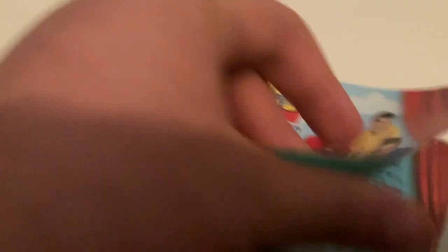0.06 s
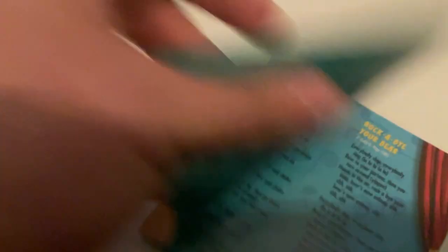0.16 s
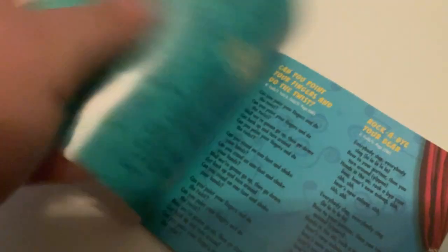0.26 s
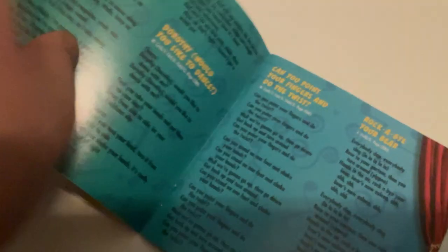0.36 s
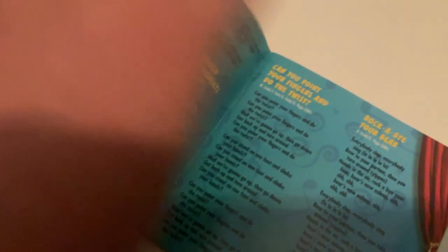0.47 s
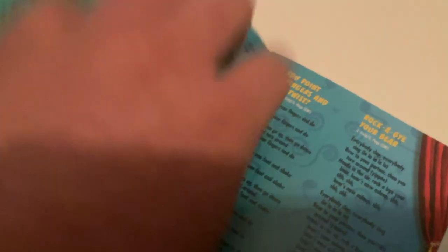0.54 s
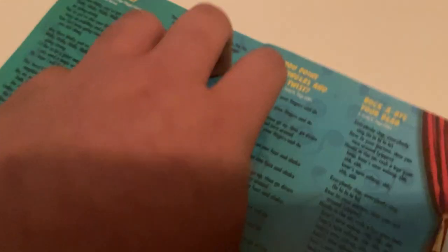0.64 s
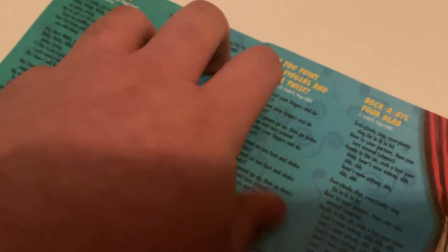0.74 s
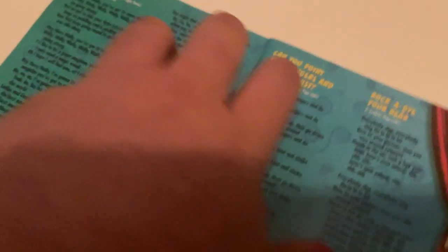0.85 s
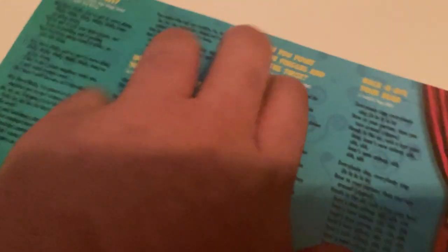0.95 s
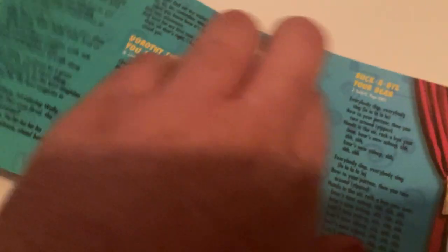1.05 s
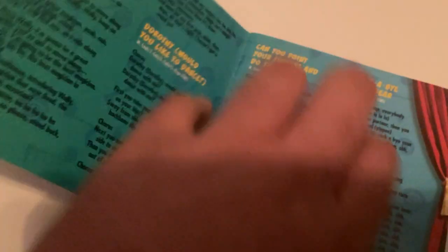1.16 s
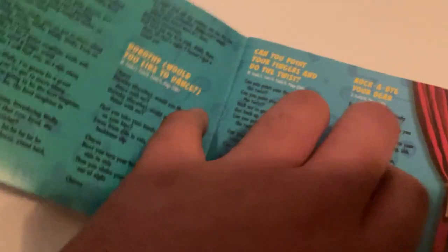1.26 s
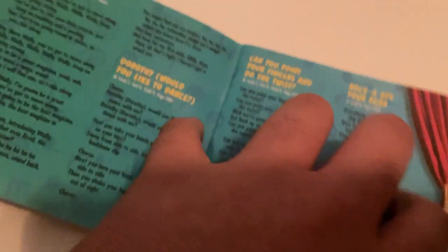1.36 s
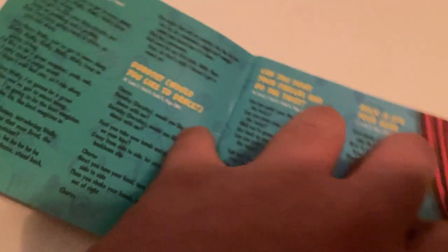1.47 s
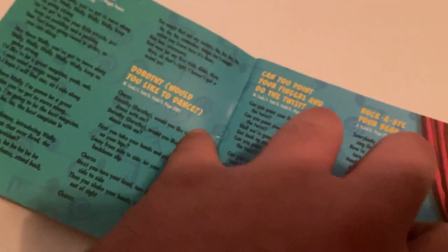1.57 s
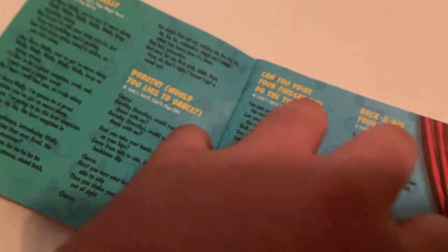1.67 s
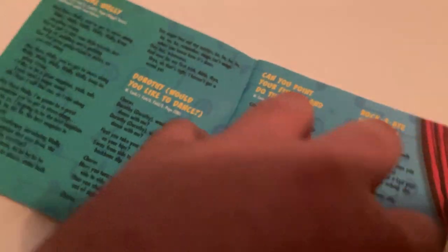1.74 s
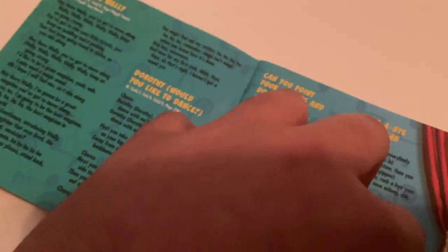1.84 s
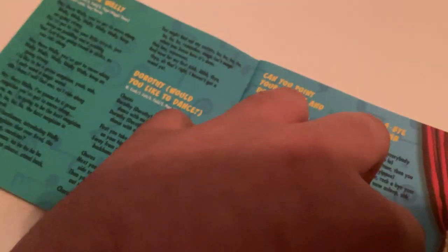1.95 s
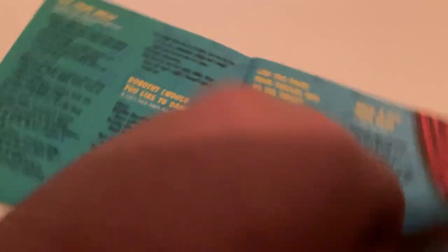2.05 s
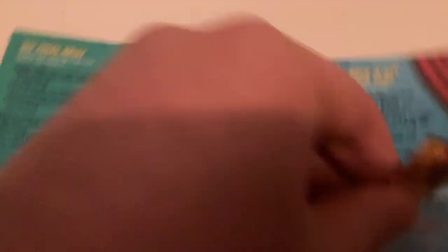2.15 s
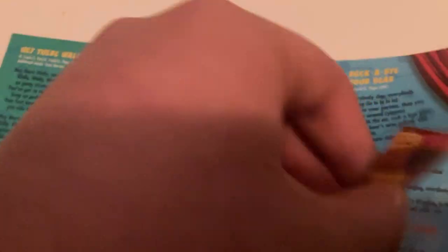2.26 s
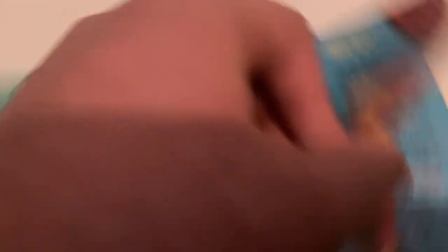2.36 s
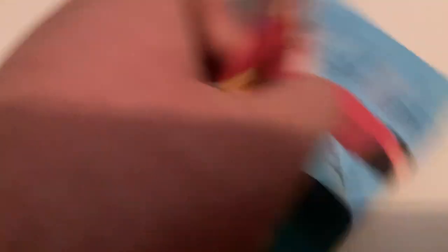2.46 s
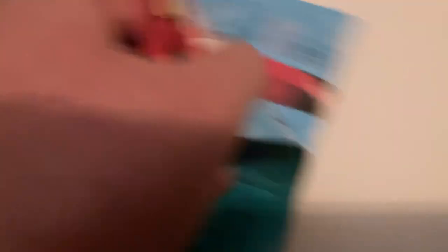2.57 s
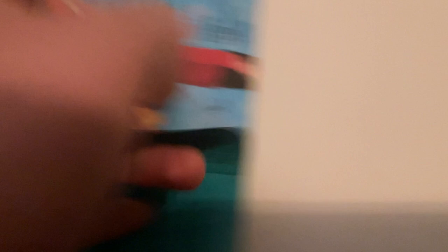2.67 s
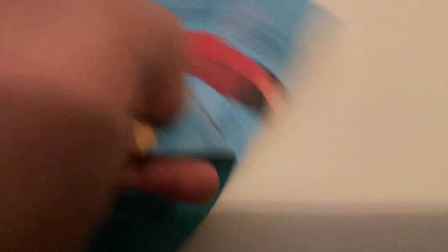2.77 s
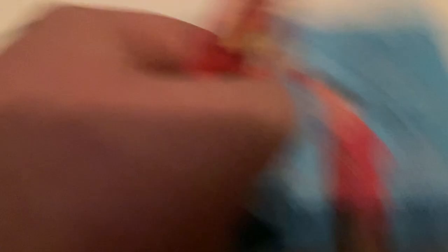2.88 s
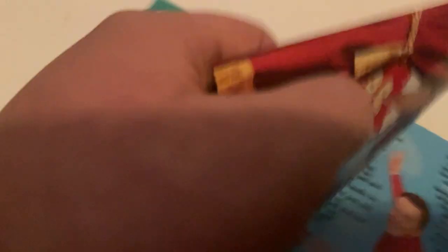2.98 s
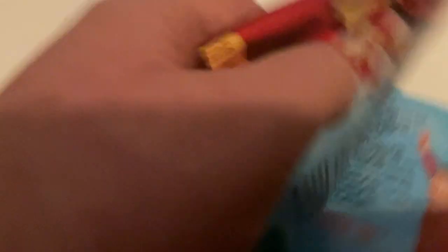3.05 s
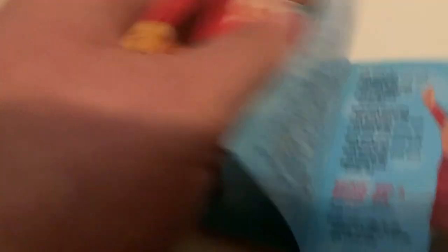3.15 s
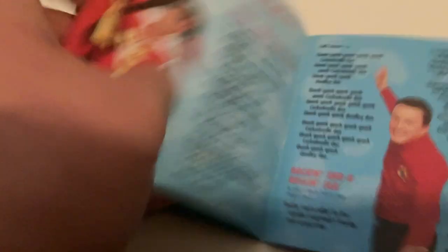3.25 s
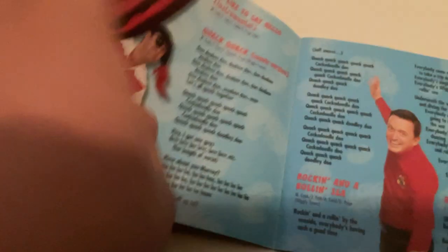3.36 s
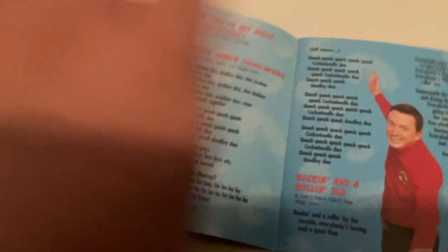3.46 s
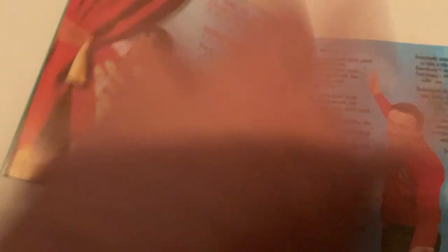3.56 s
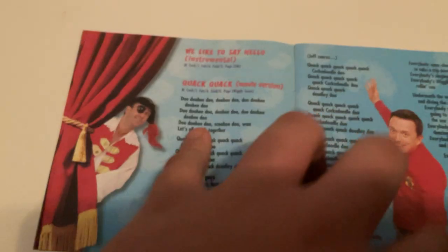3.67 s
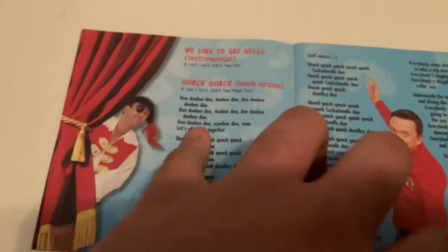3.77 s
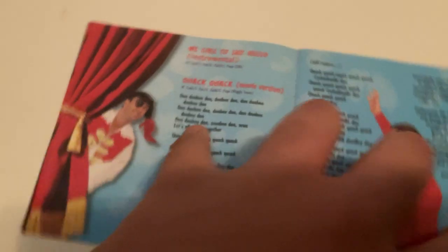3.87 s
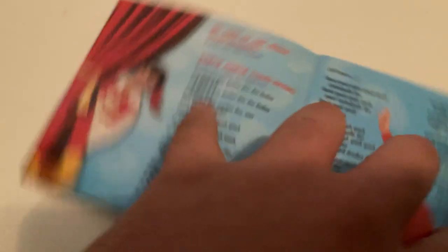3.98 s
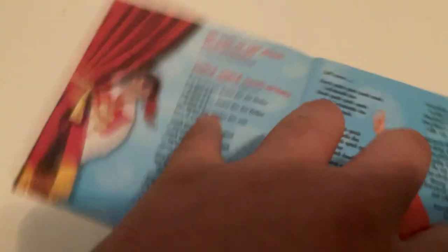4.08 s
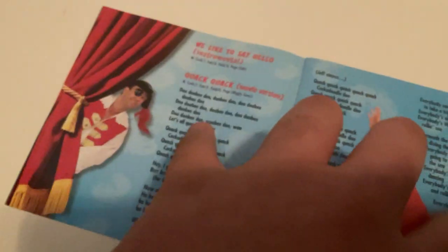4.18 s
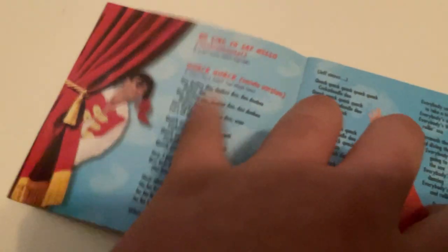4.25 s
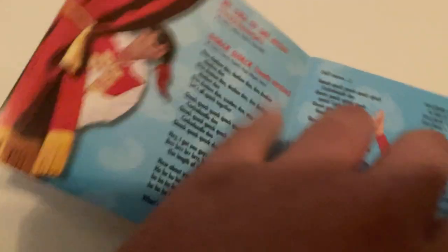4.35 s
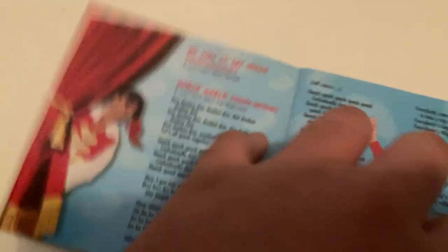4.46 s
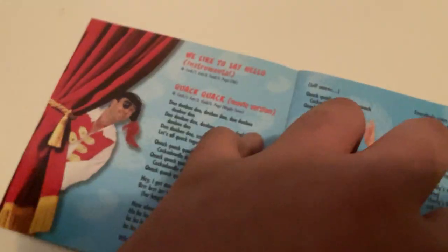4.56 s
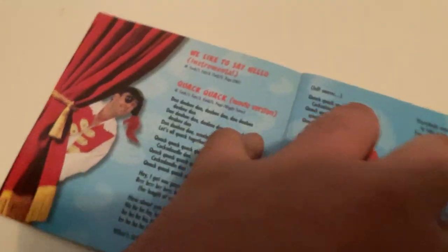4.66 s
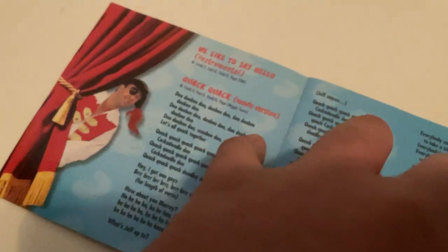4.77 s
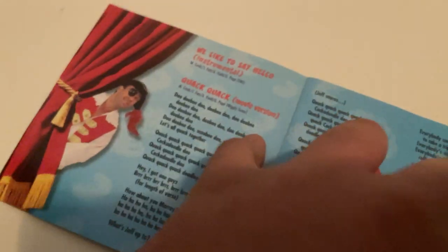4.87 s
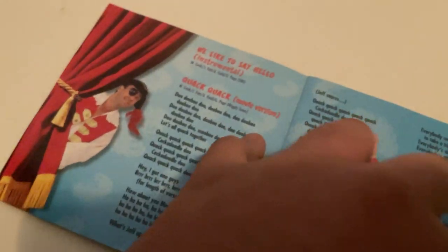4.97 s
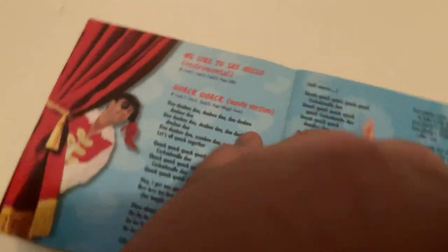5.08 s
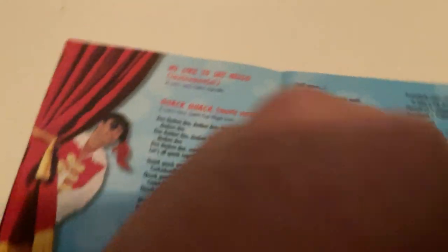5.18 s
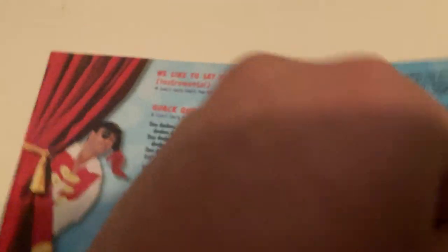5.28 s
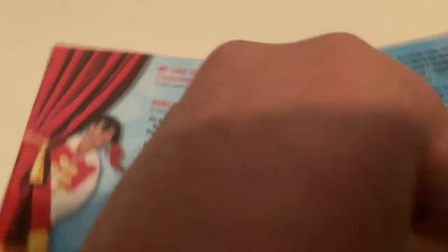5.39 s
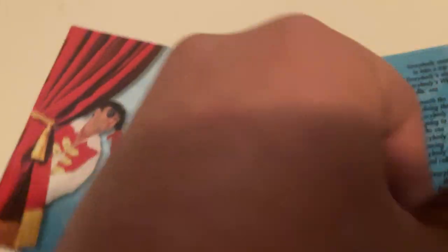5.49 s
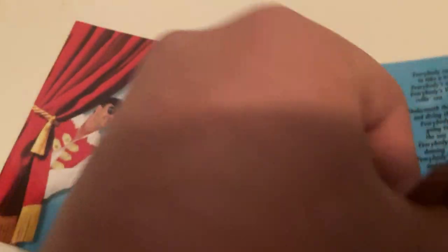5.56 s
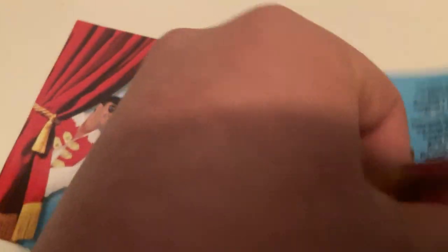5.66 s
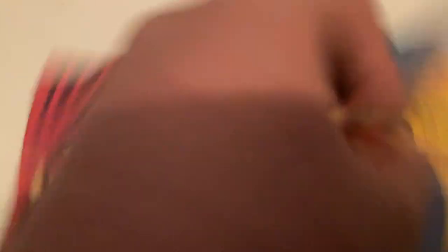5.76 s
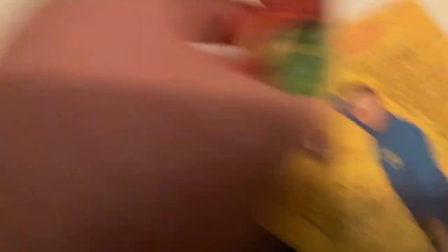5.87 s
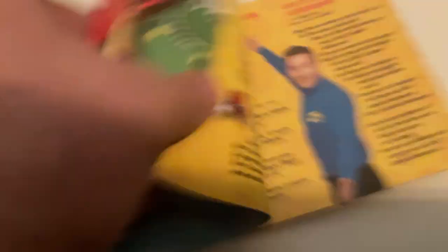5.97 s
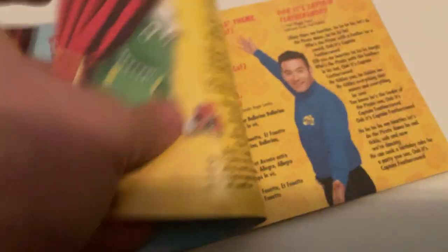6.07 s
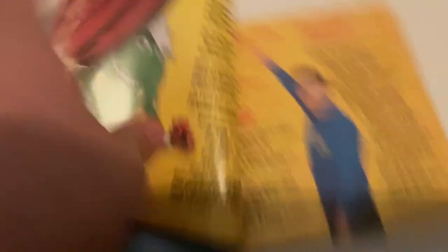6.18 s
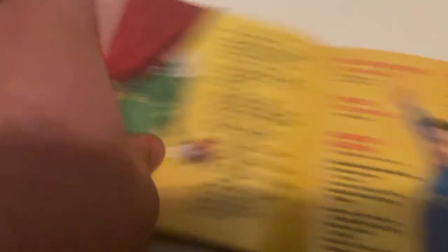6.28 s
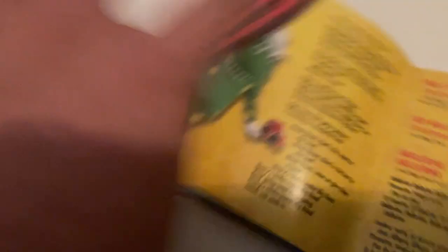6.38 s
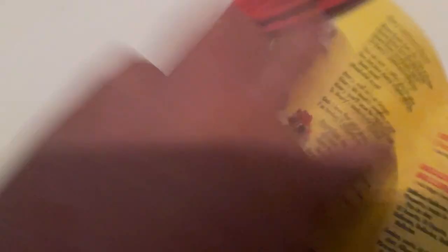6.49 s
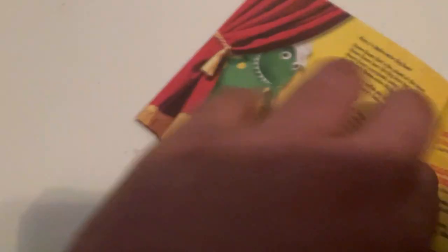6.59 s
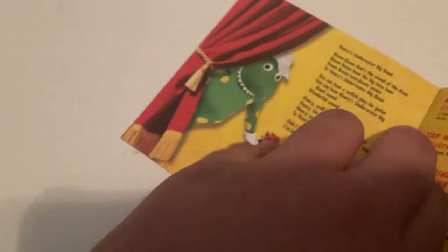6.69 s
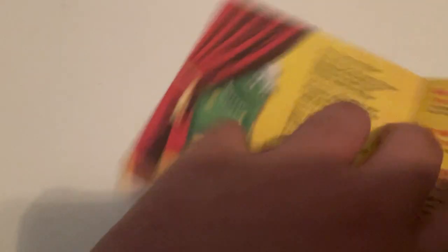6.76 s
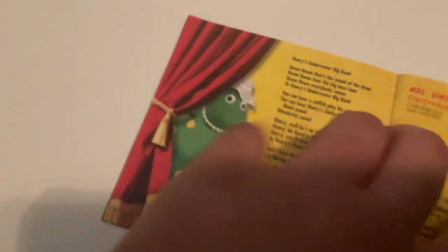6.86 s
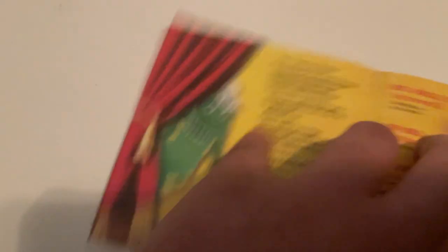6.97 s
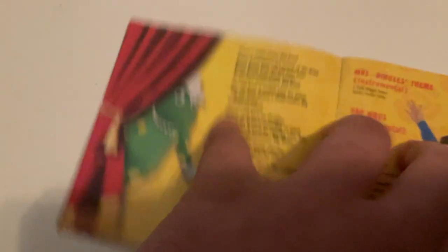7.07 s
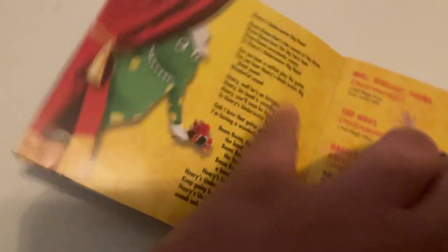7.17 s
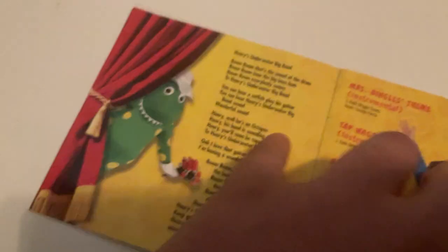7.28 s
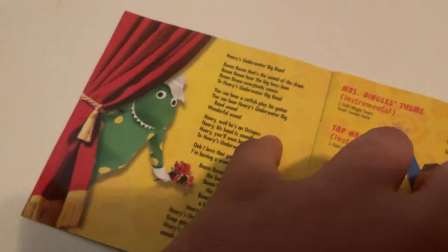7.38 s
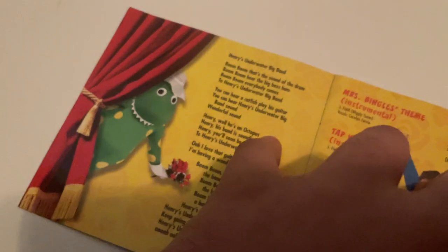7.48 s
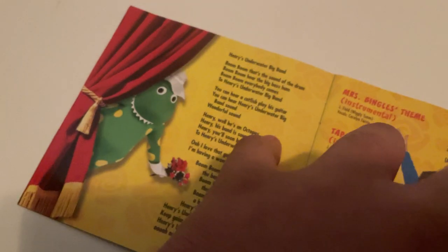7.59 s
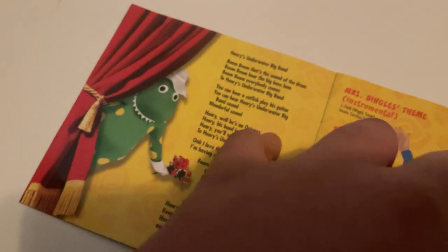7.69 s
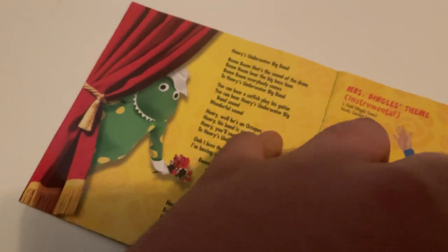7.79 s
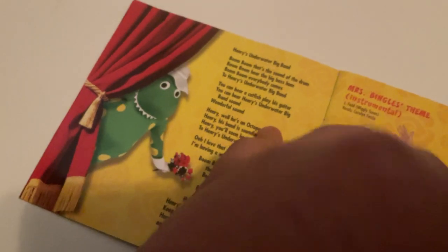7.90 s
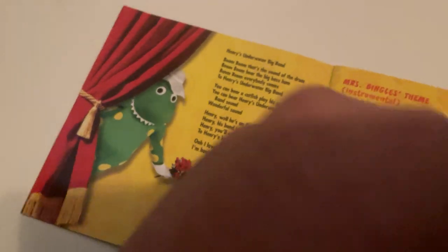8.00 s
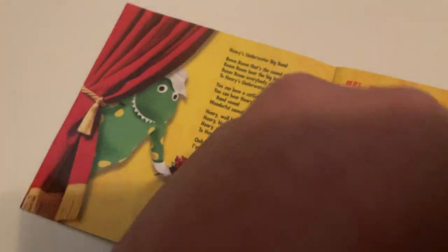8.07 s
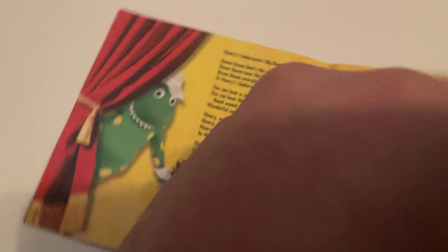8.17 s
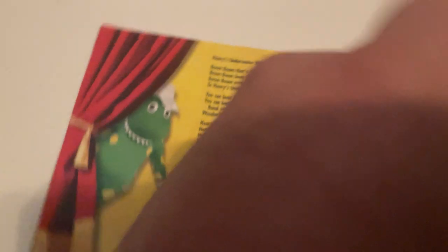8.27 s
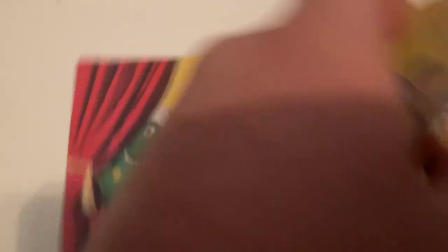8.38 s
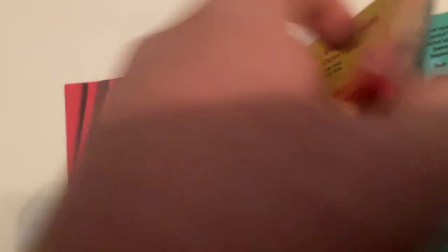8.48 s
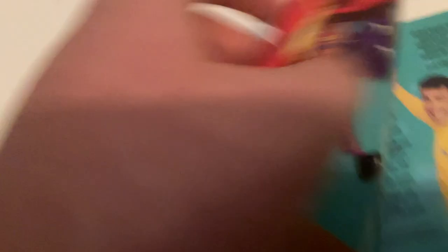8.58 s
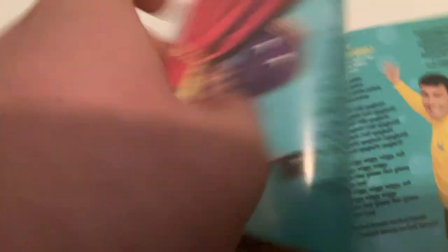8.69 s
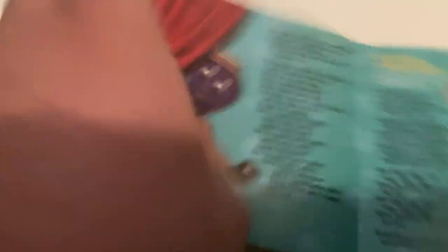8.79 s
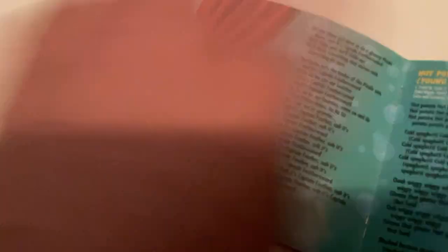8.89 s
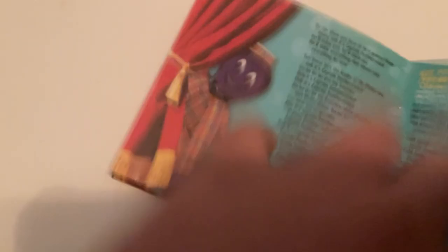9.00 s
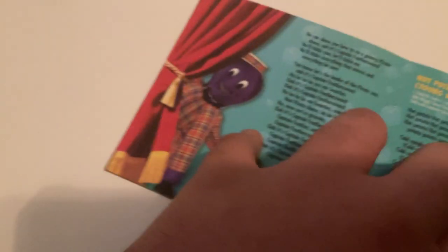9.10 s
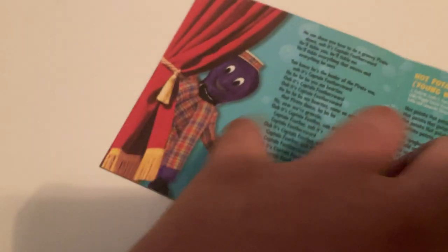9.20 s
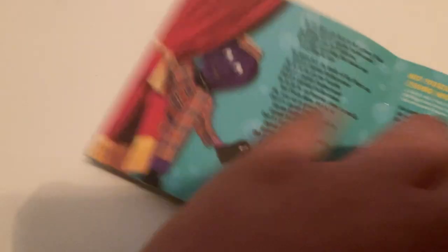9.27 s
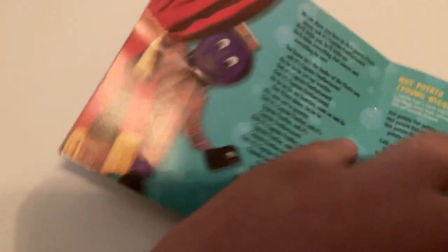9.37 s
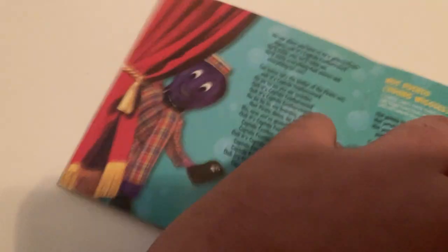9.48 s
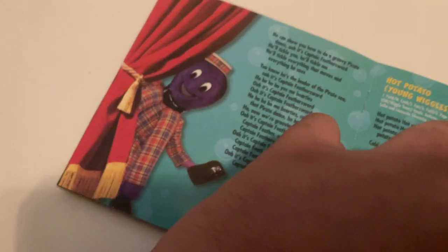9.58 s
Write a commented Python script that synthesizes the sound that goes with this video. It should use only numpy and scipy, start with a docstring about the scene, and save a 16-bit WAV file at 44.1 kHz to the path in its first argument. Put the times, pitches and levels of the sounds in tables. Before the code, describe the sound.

A glossy paper booklet is handled on a table, very close, in a small quiet room with short sparse reflections. It opens with a crisp flick, then light rustling and a small flap with a soft thump near 0.6 s. From 1 to 2 s there is only faint rubbing and ticks. Around 2.25 s the paper crackles, and sliding hiss builds into sharp flicks at 3.45 s and a hard double slap at 3.6 s. Quiet smoothing follows until 5.2 s, when scrapes and flicks resume. The busiest turn comes at 6.0-6.3 s, with loud snaps and a bright swish. Soft rubbing and small ticks fill 6.6-8.4 s. Another turn snaps at 8.6-8.85 s, then slaps down with a low thump at 9.05 s and fades into faint rubbing. Low rumble and thin hiss continue throughout, with a faint deep hum early and a slightly higher one from 7.3 s.

```python
"""A glossy paper booklet is leafed through by hand on a table, close to the microphone, in a small quiet room.
Sliding fingers and sheets hiss with dense friction grains; buckling sheets snap as pulses with a short ring.
Pages flick free or slap down in quick swelling runs of grains, and soft low thumps settle on the table.
The table top rings along, sparse reflections give the room, and a low rumble and two faint drones lie underneath."""
import sys
import numpy as np
from scipy import signal
from scipy.io import wavfile
from scipy.ndimage import map_coordinates

SR = 44100
rng = np.random.default_rng(int(sys.argv[2]) if len(sys.argv) > 2 else 0)


def unload_audio(sound):
    """Save the sound as a 16-bit wav file, at the path given as the first command line argument."""
    columns = np.transpose(np.atleast_2d(sound))
    # keep every value between -1 and 1, then stretch to whole-number steps
    steps = np.round(np.clip(columns, -1, 1) * 32767)
    wavfile.write(sys.argv[1], SR, steps.astype(np.int16))


N = 425124
EDGE_HZ = 16000  # top of the audible band here


def gain_of(db):
    """Decibels to amplitude."""
    return 10 ** (np.asarray(db) / 20)


def evened(x):
    """Scales to an rms of one."""
    return x / np.sqrt(np.mean(x ** 2) + 1e-20)


def read(points, hz):
    """Reads a curve over frequency on a log-frequency axis."""
    f, value = np.transpose(points)
    return np.interp(np.log(hz + 1), np.log(f + 1), value)


def add(mix, s, sound):
    """Mixes a sound in at time s, trimmed to fit."""
    start = round(s * SR)
    sound = sound[max(-start, 0):]
    part = mix[max(start, 0):][:len(sound)]
    part += sound[:len(part)]


def band(x, lo_hz, hi_hz, order=2):
    """Causal band-pass."""
    edges = [min(lo_hz, hi_hz / 1.1), min(hi_hz, SR / 2.1)]
    return signal.sosfilt(signal.butter(order, edges, "band", fs=SR, output="sos"), x)


def colour(x, points):
    """Gives x a spectrum, causally (minimum phase), so that clicks stay sharp."""
    hz = abs(np.fft.fftfreq(4096, 1 / SR))
    log_gain = np.log(gain_of(read(points, hz)))
    taps = np.fft.ifft(np.exp(np.conj(signal.hilbert(log_gain)))).real
    return signal.fftconvolve(x, taps[:len(taps) // 2])[:len(x)]


def wander(per_s):
    """A smooth random curve through per_s random points a second."""
    knots = rng.standard_normal(int(per_s * N / SR) + 2)
    return map_coordinates(knots, [np.arange(N) * per_s / SR], order=3, mode="nearest")


# spectrum of the background rumble and hiss, relative levels: hz [Hz], level_db [dB per Hz]
RUMBLE_SPECTRUM = [(45, -10), (115, -3), (160, -9.5), (240, -8.5), (480, -25), (900, -22), (1450, -31.5),
                   (2750, -27.5), (3300, -29.5), (8700, -72), (15800, -64.5)]


def room_tone(level_db=-57):
    """Steady rumble with a thin hiss: coloured noise."""
    return gain_of(level_db) * evened(colour(rng.standard_normal(N), RUMBLE_SPECTRUM))


# lower drone, from the start: start_s [s], pitch_hz [Hz], level_db [dB]
LOW_DRONE = [(0, 64, -59.5), (2.6, 61.75, -62), (4.0, 64.3, -71)]
# higher drone, entering late: start_s [s], pitch_hz [Hz], level_db [dB]
HIGH_DRONE = [(7.25, 95, -69), (7.6, 103, -55.5), (8.3, 106.7, -54.5), (9.6, 103.6, -65.5)]


def drone(rows, waver_db=.7):
    """A low distant tone: a sine gliding between the rows, its level wavering a little."""
    s, *columns = np.transpose(rows)
    t = np.arange(N) / SR
    hz, level_db = (np.interp(t, s, c) for c in columns)
    gain = gain_of(level_db + waver_db * wander(per_s=6))
    tone_wave = np.sqrt(2) * np.sin(2 * np.pi * np.cumsum(hz) / SR)
    return (t >= s[0]) * gain * tone_wave


# how fast the reflections die: hz [Hz], t60_s [s]
REFLECTION_DECAY = [(200, 0.2), (15000, 0.11)]


def room(x, gap_s=.004, per_s=3000):
    """Sparse reflections of random sign; the treble dies first."""
    t = np.arange(SR // 2) / SR
    taps = rng.choice([-1, 1], len(t)) * (rng.random(len(t)) < per_s / SR) * (t > gap_s)
    hz, age, spectra = signal.stft(taps, SR, nperseg=256)
    fading = gain_of(-60 * age / read(REFLECTION_DECAY, hz)[:, None])
    tail = signal.istft(spectra * fading, SR, nperseg=256)[1]
    return signal.fftconvolve(x, tail / np.linalg.norm(tail))[:N]


# ringing modes of the table top: pitch_hz [Hz], level_db [dB]
TABLE_MODES = [(1620, -26), (4600, -44)]


def table_top(x, t60_s=0.0081):
    """Whatever touches the booklet also rings the table under it: short decaying modes."""
    t = np.arange(SR // 4) / SR
    dying = gain_of(-60 * t / t60_s)
    modes = [gain_of(db) * evened(np.cos(2 * np.pi * hz * t) * dying) for hz, db in TABLE_MODES]
    return signal.fftconvolve(x, sum(modes) / np.sqrt(len(t)))[:N]


# the hand or the booklet settles on the table: start_s [s], level_db [dB], pitch_hz [Hz]
SETTLING = [(0.03, -49, 226), (0.612, -42, 97), (3.61, -41, 80), (3.644, -41, 100), (6.69, -44, 119),
            (8.63, -42, 75), (8.72, -49, 109), (9.019, -35.5, 106), (9.06, -36, 211)]


def bumps(rise_s=0.0014, decay_s=0.017):
    """A soft weight lands: a few low cycles of the table."""
    out, t = np.zeros(N), np.arange(SR // 5) / SR
    envelope = (1 - np.exp(-t / rise_s)) * np.exp(-t / decay_s)
    for s, level_db, hz in SETTLING:
        cycles = np.sqrt(2) * np.sin(2 * np.pi * hz * t)
        add(out, s, gain_of(level_db) * envelope * cycles)
    return out


# spectrum of sliding paper, relative levels: hz [Hz], level_db [dB per Hz]
PAPER_SPECTRUM = [(180, -46.5), (300, -13.5), (424, -0.5), (631, -8.5), (1300, -0.5), (1590, 5),
                  (2250, -8.5), (3630, -4), (5660, -8.5), (9450, -17), (15500, -8.5)]


def paper_colour(x):
    """Filters x to the tone of paper rubbing on paper."""
    return colour(x, PAPER_SPECTRUM)


def grains(count, per_s, spread_db):
    """Tiny slips of fibre over fibre: random clicks of uneven size."""
    size = gain_of(spread_db * np.minimum(rng.exponential(1, count), 4))
    return evened(size * rng.standard_normal(count) * (rng.random(count) < per_s / SR))


def flexing(x, share=0.32, sway=0.188):
    """Echoes between page, hand and table shift as the sheet bends, so the tone of the rubbing drifts."""
    t = np.arange(N) / SR
    soft = band(x, 500, 7000, order=1)
    gaps_s = (.0003, .0006, .00095, .0019)
    echoes = sum(np.interp(t - gap * np.exp(sway * wander(per_s=6)), t, soft) for gap in gaps_s)
    return x - share * echoes


REST_DB = -82.5  # the hand at rest still creeps on the page
# a finger or a sheet slides once: start_s [s], length_s [s], hiss_db [dB], swell_db from start to end [dB],
# body_db of the sheet [dB re hiss], fizz_db [dB re hiss]
SLIDES = [(0, 0.13, -59.5, -13, -8, -8.5), (0.158, 0.19, -59, -2.5, -9, -3),
          (0.409, 0.15, -65.5, -5, -2, 2), (0.544, 0.072, -56.5, 6, -10, -4),
          (0.625, 0.38, -65, 11.5, -12, -0.5), (1.191, 0.15, -71, 4.5, -9, -5),
          (1.344, 0.13, -66, 15.5, -13, -3), (1.715, 0.089, -69, 17, -4, -6.5),
          (1.95, 0.098, -72, 3, -6, 2), (2.022, 0.14, -55.5, 10.5, -7, -4),
          (2.237, 0.086, -49.5, 0, -2.5, -8.5), (2.33, 0.32, -51.5, 9, -17, -4),
          (2.666, 0.17, -47.5, -3, -17, -0.5), (2.86, 0.1, -46, 3.5, -10, -4),
          (2.98, .12, -54, 6, -8.5, -3.5), (3.138, 0.3, -52.5, 3.5, -9, -4.5),
          (3.635, .03, -48, -16, -6, -6), (3.801, 0.2, -59, 1.5, -15, -4),
          (4.042, .22, -65.5, -10, -10, -3.5), (4.336, 0.17, -62, 6.5, -10, -4),
          (4.537, 0.24, -69, 8, -15, -3), (4.846, 0.035, -57.5, -3.5, -13, -6),
          (4.999, 0.44, -58, 8.5, -7.5, -4), (5.259, 0.081, -47.5, -7.5, -5, -3.5),
          (5.369, 0.25, -52, -8.5, -4.5, -3.5), (5.645, 0.22, -52.5, 15.5, -10.5, -1),
          (5.91, 0.064, -43.5, 3, -11, -4.5), (6.027, 0.15, -57.5, 16, -8, -4.5),
          (6.161, 0.15, -38.5, 4, -10, -4), (6.3, 0.19, -51.5, 16.5, -11.5, -6),
          (6.61, 0.11, -59, -7.5, -12, -3), (6.745, 0.077, -52.5, -2.5, -7.5, 1.5),
          (6.856, 0.092, -57, -0.5, -9, -4), (6.977, .17, -51, -6.5, -15.5, -4.5),
          (7.178, 0.14, -61, -3, -11, -2.5), (7.402, 0.058, -67, -13, -21, -4),
          (7.63, 0.21, -73, 17, -1, -1), (7.86, .15, -57.5, -2.5, -9, -2.5),
          (8.039, 0.06, -59.5, 1, -11, -13), (8.129, 0.12, -57.5, -6.5, -0.5, -6),
          (8.24, 0.18, -62.5, 10, -4, -0.5), (8.444, .2, -58, 9, -6.5, -1.5),
          (8.679, 0.16, -47, 3.5, -3, -2.5), (9.018, .085, -51, -17.5, -3, -4.5),
          (9.14, 0.19, -65.5, 5.5, -8, -2), (9.335, .15, -59, 11, -10, -7.5),
          (9.537, 0.093, -66, -1, -6, -17)]


def strokes(attack_s=0.017, release_s=0.03, arch_db=2):
    """Levels (dB) of hiss, body and fizz: a stroke gets going, arches midway, and coasts to a stop."""
    power = np.full((3, N), gain_of(REST_DB) ** 2)
    for start, length, level_db, swell_db, body_db, fizz_db in SLIDES:
        t = np.arange(0, length + 8 * release_s, 1 / SR)
        along = np.minimum(t / length, 1)
        arch = arch_db * (np.sin(np.pi * along) - 2 / np.pi)
        hold = gain_of(level_db + swell_db * (along - .5) + arch)
        attack = np.minimum(t / attack_s, 1)
        release = np.exp(-np.maximum(t - length, 0) / release_s)
        speed = attack * hold * release
        for layer, db in zip(power, (0, body_db, fizz_db)):
            add(layer, start, (speed * gain_of(db)) ** 2)
    return 10 * np.log10(power)


def sliding(catch_s=.0013, judder_db=1.76, tick_db=-37, ticks_per_s=28):
    """Dense friction grains under an unsteady hand; slow rubbing breaks up into separate ticks."""
    level_db, body_db, fizz_db = strokes()
    judder = evened(band(rng.standard_normal(N), 17.5, 85))
    hits = rng.random(N) * (rng.random(N) < ticks_per_s / SR)
    catches = signal.lfilter([1], [1, -np.exp(-1 / (catch_s * SR))], hits)
    # ticks stand out most where the rubbing is light
    ticks = evened(catches * rng.standard_normal(N)) * gain_of(tick_db - .5 * level_db)
    ticks = ticks * (1 - gain_of(REST_DB - level_db))  # and stop when the hand rests
    friction = grains(N, per_s=15000, spread_db=-2.1) * gain_of(judder_db * judder) + ticks
    rub = paper_colour(flexing(friction))
    # a lifted sheet radiates its low body; a flat one leaves hiss and the fizz of the fibres
    body = gain_of(body_db) * evened(band(rub, 310, 1235, order=3))
    hiss = gain_of(level_db) * evened(band(rub, 2135, 6520, order=4))
    fizz = gain_of(fizz_db) * evened(band(rub, 7120, EDGE_HZ, order=4))
    return body + hiss + fizz


def tone(level_db, hz, crack_db, usual_thud_db):
    """Thud, crack and fizz of a contact (dB re ring) follow from its force, its pitch and its sharpness."""
    force_db = level_db + 43  # re a contact of usual level
    octaves = np.log2(hz / 2000)  # re the usual pitch
    # large, low folds thud more; hard contacts add more ring than thud
    thud_db = usual_thud_db - 4.5 * octaves - 0.228 * force_db
    # fizz follows the crack, and lags behind in hard contacts
    fizz_db = -7.5 + 0.42 * crack_db - 0.3527 * force_db
    return thud_db, crack_db, fizz_db


def sheet(push, crackle, level_db, hz, thud_db, crack_db, fizz_db, width=1.59):
    """A contact rings the bent sheet briefly, thuds through the pages below, and cracks and fizzes in the treble."""
    ring = evened(band(push, hz / width, hz * width, order=3))
    thud = gain_of(thud_db) * evened(band(push, 135, 570))
    crack = gain_of(crack_db) * evened(band(crackle, 3700, 7000, order=4))
    fizz = gain_of(fizz_db) * evened(band(paper_colour(crackle), 8500, EDGE_HZ, order=4))
    over_10_ms = np.sqrt(.01 * SR / len(push))  # the ring's level counts its energy over 10 ms
    return gain_of(level_db) * (ring + thud + crack + fizz) * over_10_ms


# a page edge scrapes past or lands: peak_s [s], level_db of the ring over 10 ms [dB], pitch_hz of the ring [Hz],
# crack_db [dB re ring], length_s [s]
PAGE_FLICKS = [(0.007, -33.5, 2920, -11.5, 0.011), (0.062, -48.5, 2280, -17, 0.03),
               (0.474, -45, 1340, -8, 0.017), (0.595, -43, 980, -24, 0.025),
               (1.009, -49, 2100, -7.5, 0.022), (1.2, -49.5, 630, -33, .026), (2.705, -51, 1500, -8, 0.027),
               (3.047, -50.5, 2060, -16, 0.013), (3.183, -51, 1900, -6, 0.02),
               (3.325, -42.5, 1400, -8, 0.028), (3.344, -36, 1560, -15, 0.019),
               (3.433, -47.5, 2550, 12, 0.0035), (3.45, -38.5, 1480, -41, 0.014),
               (3.461, -29, 1650, -12, 0.0063), (3.6043, -22, 3630, -24, 0.0083),
               (3.6053, -21.5, 1740, -20, 0.011), (3.627, -33.5, 2000, -6.5, .024),
               (3.644, -29.5, 2310, -9, 0.012), (4.087, -50, 2450, -1.5, 0.0077),
               (4.243, -54, 2430, 4, 0.0053), (5.296, -32, 1950, -10, 0.028),
               (5.345, -44.5, 1650, -14, .04), (5.466, -38, 2350, -0.5, 0.018),
               (5.524, -28, 3700, -11, 0.0055), (5.554, -32, 1700, -14, 0.018),
               (6.025, -29.5, 1990, -3, 0.0031), (6.039, -36, 2170, -3, 0.0052),
               (6.047, -32.5, 1360, -10, 0.0081), (6.118, -39, 1980, -8.5, .005),
               (6.2195, -20, 1940, -16, 0.01), (6.525, -39.5, 1680, -32, 0.019),
               (6.947, -53.5, 1800, -13, .015), (7.221, -53.5, 1600, -8, 0.013),
               (7.87, -46.5, 1780, -1.5, .011), (8.146, -47, 2100, -9, .01),
               (8.401, -44.5, 2190, -3, 0.0072), (8.61, -32.5, 1140, -17, 0.019),
               (8.649, -45.5, 1640, -11, 0.006), (8.7903, -26, 1920, -28, 0.0077),
               (8.819, -39, 2000, -3, 0.029), (9.032, -29.5, 1450, -26, .013),
               (9.04, -28.5, 1850, -27, 0.012), (9.059, -32, 1360, -28, 0.012),
               (9.07, -39, 1990, -9, 0.023)]


def flicks(rise_share=0.41, usual_thud_db=-8.5, puff_db=-21, puff_hz=(60, 170)):
    """A page edge lets go or lands in a quick swelling run of slips, and pushes out a puff of air."""
    out, t = np.zeros(N), np.arange(-2048, 6144) / SR
    for s, level_db, hz, crack_db, length in PAGE_FLICKS:
        rise, fall = length * rise_share, length * (1 - rise_share)
        contact = np.where(t < 0, np.exp(-(t / rise) ** 2), np.exp(-abs(t / fall) ** 1.5))
        slips = contact * grains(len(t), per_s=13000, spread_db=1.3)
        rustle = sheet(slips, slips, level_db, hz, *tone(level_db, hz, crack_db, usual_thud_db))
        puff = gain_of(puff_db) * rustle.std() * evened(band(slips, *puff_hz))
        add(out, s + t[0], rustle + puff)
    return out


# the sheet buckles: start_s [s], level_db of the ring over 10 ms [dB], pitch_hz of the ring [Hz],
# crack_db [dB re ring], decay_s [s]
BUCKLES = [(0.024, -45.5, 2430, -14, .005), (0.1815, -57.5, 2300, -1, .004),
           (0.3022, -51, 1520, -4, 0.0052), (0.318, -50.5, 2590, 2, 0.0066),
           (0.363, -48, 2030, -5.5, 0.0064), (0.558, -48, 1690, -18, 0.0055), (0.569, -45, 2200, -12, .003),
           (0.5755, -40.5, 2410, -10.5, 0.0023), (0.595, -47, 1870, -13, 0.0041),
           (0.612, -46.5, 2740, -7, 0.0022), (0.863, -56, 2600, -4, .002), (1.176, -60, 1810, -6, 0.0029),
           (1.1869, -45.5, 850, -46, 0.0069), (1.756, -52, 2800, -21, .0025),
           (2.0479, -54, 2600, 0, 0.0013), (2.1476, -49, 1830, -8, .004), (2.2461, -44, 2370, 0, 0.0024),
           (2.2638, -34.5, 2020, -5, .008), (2.2723, -36, 2410, -2, 0.0011),
           (2.3044, -41.5, 1880, -5.5, 0.0042), (3.096, -51, 2410, -16, .005),
           (3.2526, -41, 1240, -4, 0.0043), (3.4576, -32, 1650, -17, 0.0034),
           (3.5951, -46, 2300, 2, 0.0015), (3.9995, -53, 2040, -3, 0.011), (4.387, -56, 1760, 0, 0.0046),
           (4.4915, -47.5, 1440, -32, 0.0068), (5.025, -59, 2530, 0, 0.0011),
           (5.0572, -51.5, 2700, -8, 0.0043), (5.09, -50.5, 2530, -14, 0.0015),
           (5.26, -33, 2600, -8, 0.002), (5.6112, -39, 1990, -9, 0.0066), (5.7577, -47.5, 2070, -4, 0.0073),
           (6.013, -29, 1780, -7, 0.0052), (6.0204, -20.5, 1900, -27, 0.0033),
           (6.2117, -30.5, 2610, -0.5, 0.0028), (6.483, -38.5, 2800, -8, 0.007),
           (6.6861, -47, 3060, 1, .004), (6.7323, -48.5, 3300, -4, 0.0069), (6.703, -58, 1720, 3, 0.003),
           (6.8385, -51.5, 1680, -18, 0.0058), (7.188, -53, 1520, -5, 0.0024),
           (7.2794, -49, 3220, -11, 0.0073), (7.7972, -59.5, 2300, 2, 0.0025),
           (7.9675, -49.5, 2850, -12, 0.0025), (8.0735, -55, 2770, -21, 0.0022),
           (8.091, -47, 2340, -7, 0.0045), (8.1277, -42.5, 2030, -7, 0.0036),
           (8.1443, -38, 1680, -6, 0.0018), (8.1732, -49, 1740, -15, 0.0024),
           (8.178, -41, 1740, -11, .0035), (8.212, -50, 2100, -12, 0.0036), (8.6021, -41, 1760, 1, 0.0036),
           (8.6932, -26.5, 1230, -49, 0.0032), (8.8435, -31, 2370, -12.5, 0.0037),
           (9.0156, -42, 1640, -7.5, .007), (9.0634, -19, 2020, -25, .0035),
           (9.362, -52.5, 1520, -0.5, 0.0068), (9.394, -59, 2000, 0, 0.0022),
           (9.599, -56.5, 2080, -27, 0.0029)]


def snaps(scatter=1.0, mode=0.099, crack_life=0.48, crack_rise_s=0.00044, usual_thud_db=-9):
    """Each buckle is one sharp pulse, a few cycles of the bent sheet, and waves scattered from its edges."""
    out, t = np.zeros(N), np.arange(2048) / SR
    for s, level_db, hz, crack_db, decay in BUCKLES:
        dying = np.exp(-t / decay)
        swing = np.cos(2 * np.pi * hz * t) * dying
        waves = rng.standard_normal(len(t)) * dying
        # the crack builds just after the first pulse and dies sooner than the ring
        crack_envelope = (1 - np.exp(-t / crack_rise_s)) * dying ** (1 / crack_life)
        crackle = rng.standard_normal(len(t)) * crack_envelope
        pulse = t == 0
        push = pulse + mode * swing / np.linalg.norm(swing) + scatter * waves / np.linalg.norm(waves)
        add(out, s, sheet(-push, crackle, level_db, hz, *tone(level_db, hz, crack_db, usual_thud_db)))
    return out


def scene(room_db=-16):
    """The booklet close by on its table, its reflections, and the background."""
    paper = snaps() + flicks() + sliding() + bumps()
    booklet = paper + table_top(paper)
    reflections = gain_of(room_db) * room(booklet)
    background = room_tone() + drone(LOW_DRONE) + drone(HIGH_DRONE)
    return (booklet + reflections + background)[None]


def record(dry):
    """The microphone sheds the deepest bass; then the band limit takes off the extreme treble."""
    thinned = signal.sosfilt(signal.butter(8, 52, "high", fs=SR, output="sos"), dry)
    band_limit = signal.firwin(511, EDGE_HZ, window=("kaiser", 9), fs=SR)
    return signal.oaconvolve(thinned, band_limit[None], "same")


dry = scene()
out = record(dry)
unload_audio(out)
```